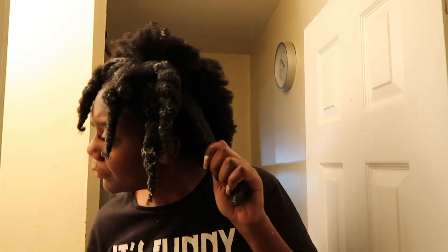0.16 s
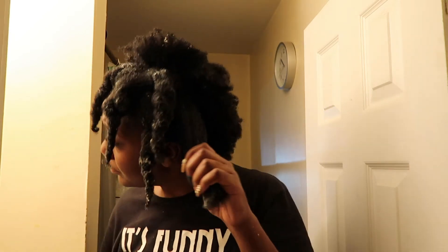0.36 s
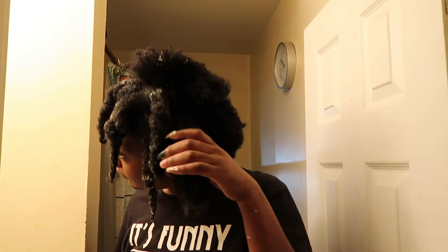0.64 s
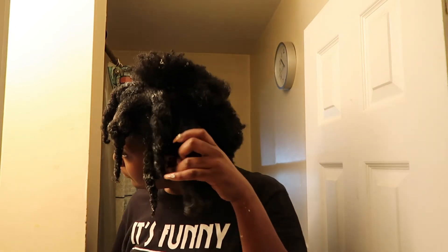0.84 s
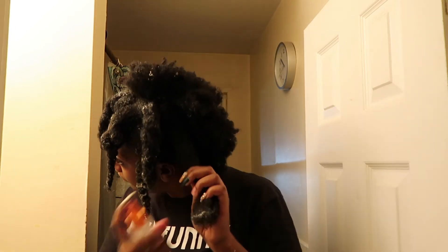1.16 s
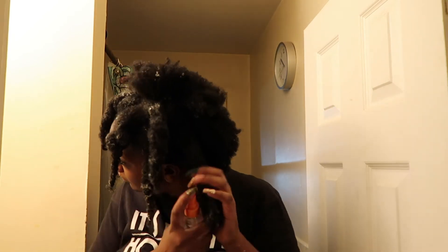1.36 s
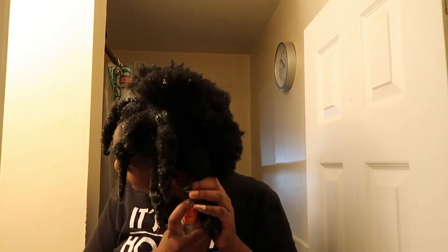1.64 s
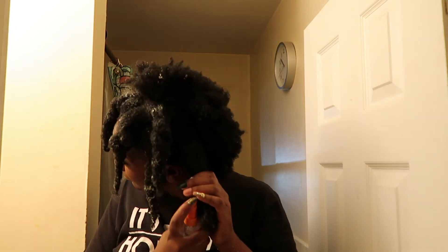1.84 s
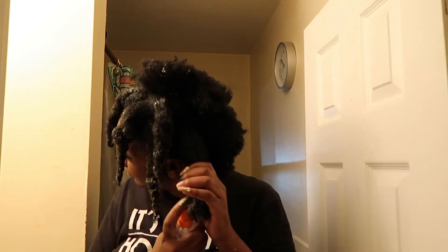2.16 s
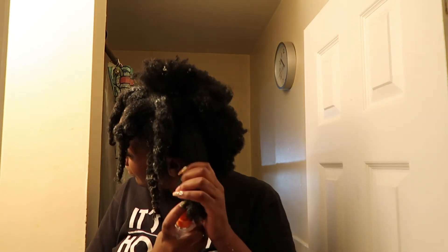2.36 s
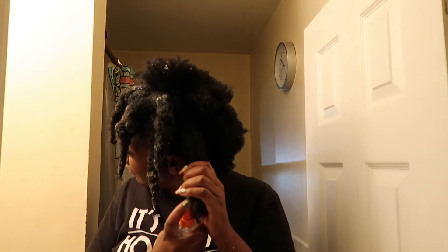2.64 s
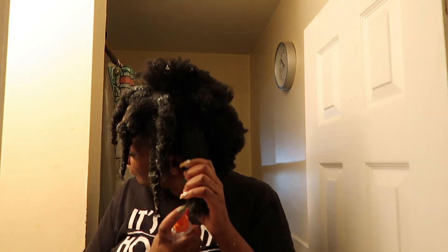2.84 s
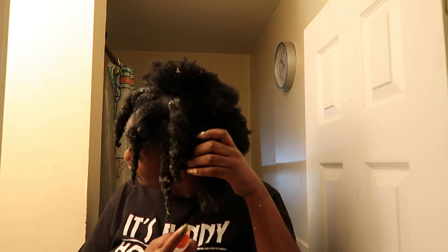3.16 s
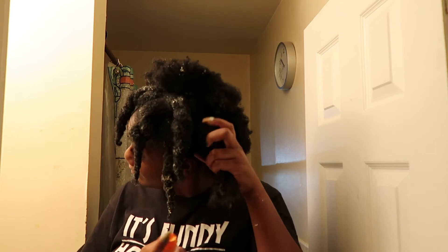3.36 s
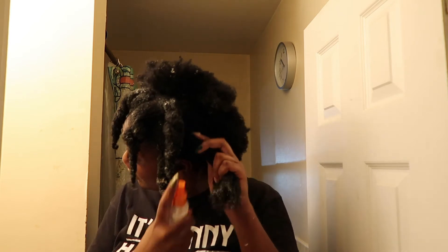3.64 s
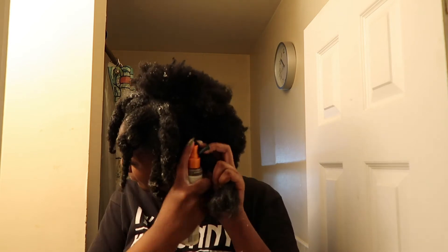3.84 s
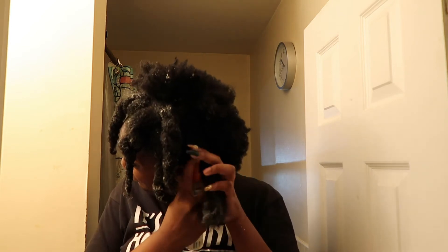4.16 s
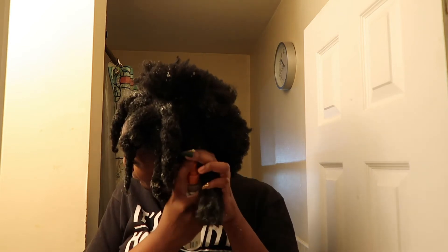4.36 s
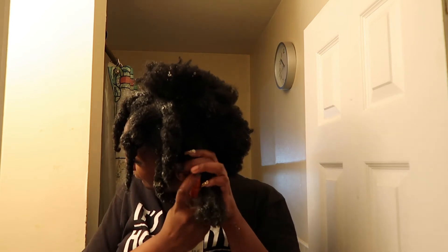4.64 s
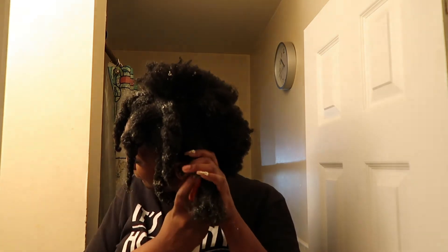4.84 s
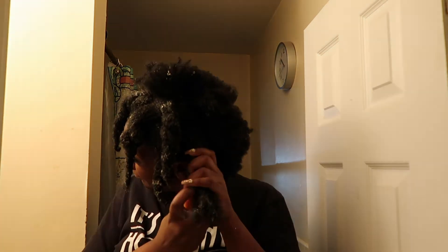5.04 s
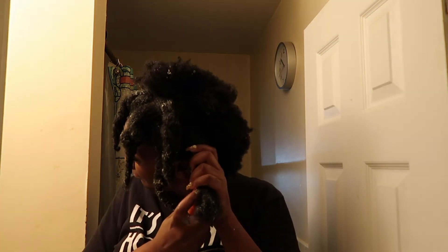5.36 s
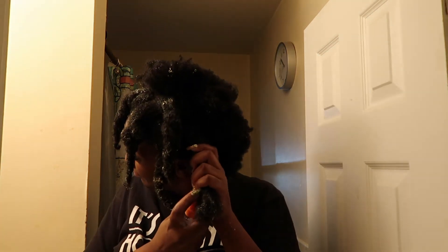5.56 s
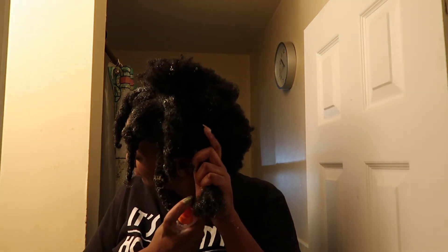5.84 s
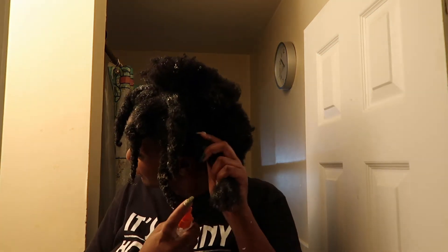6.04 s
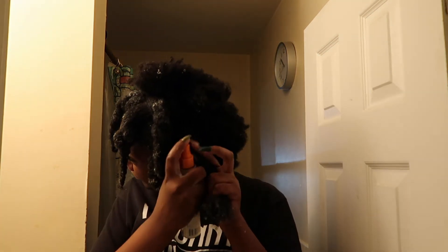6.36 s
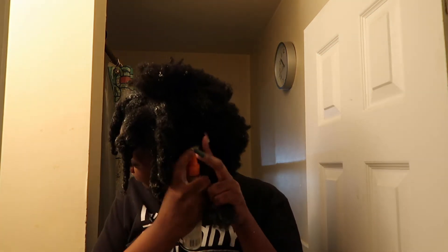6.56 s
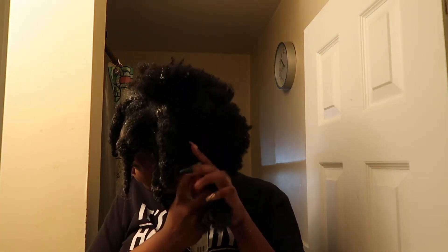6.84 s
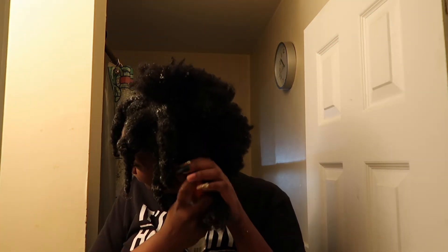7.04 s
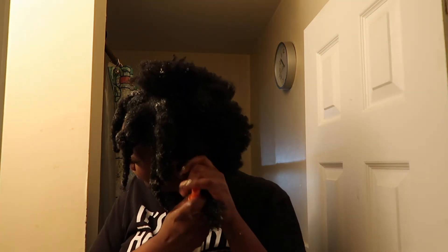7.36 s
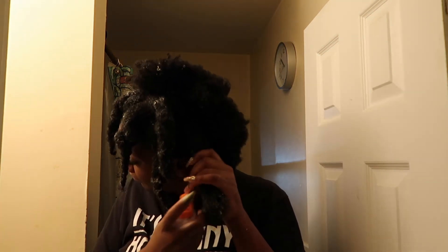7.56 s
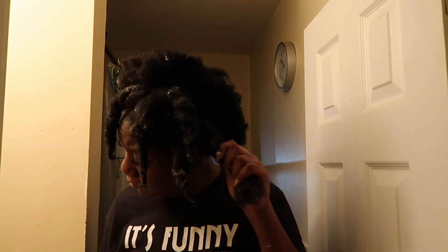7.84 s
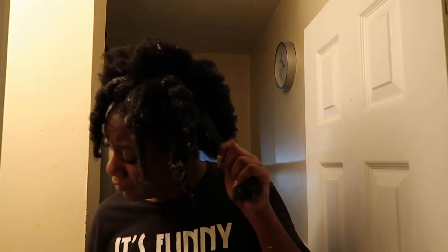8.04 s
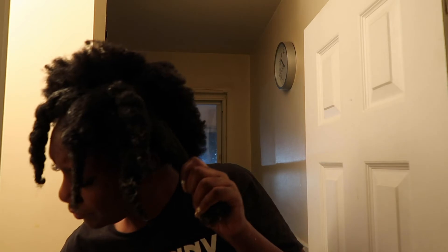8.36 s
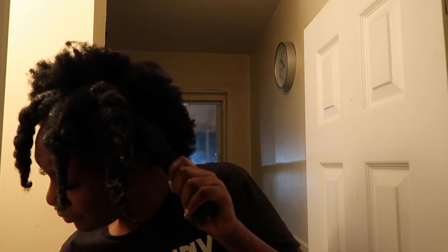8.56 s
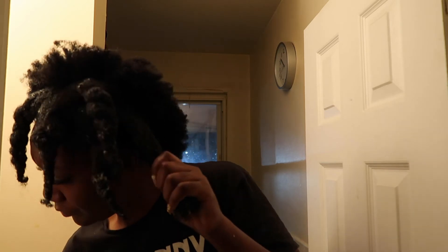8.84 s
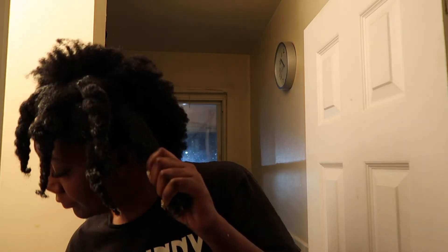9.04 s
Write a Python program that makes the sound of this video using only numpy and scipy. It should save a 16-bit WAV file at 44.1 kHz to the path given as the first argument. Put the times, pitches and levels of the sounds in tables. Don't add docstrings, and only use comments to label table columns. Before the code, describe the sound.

In a small hard room, a plastic spray bottle clicks and mists hair in short hissing bursts, then is set down with a thump.

```python
import sys
import numpy as np
from scipy import signal
from scipy.fft import rfft, irfft, next_fast_len
from scipy.io import wavfile
from scipy.ndimage import uniform_filter1d, map_coordinates

SR = 44100
rng = np.random.default_rng(int(sys.argv[2]) if len(sys.argv) > 2 else 0)


def decibels_to_gain(level_db):
    exponent = np.asarray(level_db, float) / 20
    return 10 ** exponent


def dump(signal):
    limited = np.clip(np.atleast_2d(signal).T, -1, 1)
    pcm = np.round(limited * 32767).astype(np.int16)
    wavfile.write(sys.argv[1], SR, pcm)


N = 405279
TIME = np.arange(N) / SR

# time [s], strength [dB].
VENTILATION = [(0.0, -49), (0.25, -54), (0.71, -49.5), (1.12, -55.5), (1.56, -54.5), (1.74, -54.5),
               (2.1, -53), (2.28, -53), (6.17, -54), (6.4, -51), (7.78, -53.5), (8.34, -53), (9.19, -51.5)]
# frequency [Hz], level [dB per Hz].
RUMBLE = [(12, -41), (20, -17), (32, 4.5), (80, 2), (118, 1.5), (133, -4.5), (151, -17), (160, -21),
          (210, -55), (350, -120)]
# frequency [Hz], level [dB per Hz].
DRONE = [(65, -59), (110, -5.5), (151, -10.5), (182, -7), (263, -9.5), (327, -8.5), (367, -15), (404, -12),
         (570, -23.5), (900, -30), (1170, -35), (1980, -120)]
# frequency [Hz], level [dB per Hz].
HISS = [(290, -31), (500, -5), (529, -2.5), (576, -5), (1660, -8.5), (3120, -11.5), (3700, -12.5),
        (4080, -14.5), (5260, -15.5), (12800, -27.5), (14500, -28)]
# time [s], rustle [dB].
RUSTLE = [(0.0, -64), (0.82, -65), (1.92, -62.5), (2.79, -65), (2.92, -62), (3.66, -65), (4.66, -65),
          (4.76, -63.5), (6.68, -65), (7.09, -63), (7.73, -64.5), (9.19, -65)]
# frequency [Hz], side minus mid [dB].
PORTS_NEAR = [(60, -23), (110, -50), (200, -47), (380, -17), (700, -28), (1290, -23), (2380, -15.5),
              (4400, -7.5), (8120, 1.5), (15000, 6)]
# frequency [Hz], side minus mid [dB].
PORTS_FAR = [(60, -42), (110, -13.5), (200, -5), (380, -1), (700, 0.5), (1290, 0), (2380, -1.5), (4400, -2),
             (8120, -1), (15000, 1)]
# frequency [Hz], t60 [s].
ROOM = [(100, 0.22), (500, 0.15), (2500, 0.47), (6000, 0.44), (12000, 0.091)]
# start [s], boom [dB],
# knock minus boom [dB], clack minus boom [dB], boom pitch ratio.
THUMPS = [
    (-0.085, -30, -2, -15, 0.685),
    (8.599, -30.5, 1, -13.5, 1.03),
]
# frequency [Hz], level [dB], t60 [s].
COUNTER = [(100, 8, 0.47), (163, 10.5, 0.53), (227, 9.5, 0.69)]
# frequency [Hz], level [dB per Hz].
WOOD = [(120, -35), (200, -7.5), (328, 0.5), (364, -8.5), (503, -3), (699, -14.5), (748, -12), (795, -26),
        (863, -14.5), (1200, -36.5), (1560, -59), (2640, -120)]
# frequency [Hz], level [dB per Hz].
BASE = [(590, -35), (1000, -17), (1270, -9), (1410, 7), (1740, -10), (2240, 2), (2590, -12), (2840, 2.5),
        (3560, -11), (4370, -9), (5480, -19.5), (7000, -30), (9100, -28), (15400, -120)]
# start [s], peak [dB], ring [Hz], low knock minus peak [dB].
TICKS = [(0.4653, -47, 2560, -8), (1.15, -50, 5500, -22), (1.2632, -31, 2790, -11),
         (2.7535, -32, 2760, -16), (3.951, -49, 2990, -16), (4.0372, -27.5, 2800, -13.5),
         (4.573, -31.5, 2800, -17), (4.9636, -30.5, 2680, -14), (5.3722, -33, 2790, -19.5),
         (6.6498, -32, 2780, -11), (7.274, -36, 2800, -15), (8.6006, -25.5, 2830, -10),
         (8.7894, -49, 1640, 12), (9.1526, -52, 3630, -20)]
# start [s], peak [dB], ring [Hz], low knock minus peak [dB].
SCUFFS = [(1.925, -38, 2720, -14), (2.1974, -49, 1830, -24), (2.359, -40, 2840, -13),
          (4.4373, -53, 1870, -11), (5.2145, -44, 1800, -12), (5.692, -44, 1450, -1), (7.128, -43, 2270, 1),
          (7.3552, -42, 2700, -4), (7.386, -44, 1790, 3), (7.6887, -47, 1640, 10)]
# start [s], length [s], mist [dB], ring centre [Hz], air in the jet [dB].
SQUEEZES = [(1.598, 0.11, -46, 2700, 0), (1.989, .12, -46, 2800, 2.5), (2.433, 0.099, -47, 2480, 3),
            (2.778, .11, -43.5, 2820, 0), (4.239, 0.092, -52, 2230, 0.5), (4.624, 0.12, -45, 2780, -2),
            (5.0, .13, -45, 2900, -4.5), (5.434, 0.12, -47.5, 2550, -6.5),
            (5.796, 0.079, -47.5, 2700, -0.5), (6.95, .11, -41, 2840, -1)]
# low rasp minus mist [dB], nozzle cup minus mist [dB].
GRIPS = [(0.5, -6), (-3, -7), (-7, -9.5), (-8, -28), (-5, -14), (-2.5, -3), (-16, -15), (-27, -4),
         (-2, -10), (-5.5, -7)]
# frequency [Hz], level [dB per Hz].
MIST = [(1940, -12), (3300, -9), (3760, -5.5), (4750, -7.5), (5070, -6), (6960, -5.5), (8300, -11.5),
        (12500, -11), (14400, -16), (15300, -1), (15600, -45)]
# resonance [Hz], width [Hz], level [dB].
BOTTLE = [(1980, 540, 0), (2400, 240, 0), (2800, 280, 2.5), (3280, 170, 0)]
# resonance [Hz], width [Hz], level [dB].
NECK = [(1238, 320, 3.5), (1620, 3300, -2)]
# resonance [Hz], width [Hz], level [dB].
NOZZLE = [(4340, 740, 0)]

RUMBLE_DB, DRONE_DB, DRONE_FOLLOWS = -50.5, -53.5, 0.05
RUSTLE_DB, LOW_RUSTLE_DB, LOW_FOLLOWS = -64.5, -60.5, 0.89
WHINE_HZ, WHINE_RATE = 13011, 25.0029
CREAK_S, CREAK_LENGTH_S, CREAK_HZ, CREAK_DB, CREAK_SAG_HZ = 8.94, 0.2, 256, -56.5, 22.3
LAND_S, HOLD_S = 0.037, 0.17
BOOM_DB_PER_S, DAMPED_DB_PER_S, KNOCK_DB_PER_S, CLACK_DB_PER_S = 83, 159, 161, 230
OPEN_S, CRACK_DB, SWELL_DB, CREST, SAG_DB, SHUT_DB_PER_S = 0.012, -1.5, 4.5, 0.34, 0.5, 420
RING_DB, RING_HZ_PER_DB, SPUTTER_DB = 3.5, 60, -1.5


def unit(x):
    return x / np.sqrt(np.mean(x ** 2) + 1e-20)


def along(points, hz):
    f, v = np.transpose(points)
    return np.interp(np.log(hz + 1), np.log(f + 1), v)


def swing(rows):
    db = np.interp(TIME, *np.transpose(rows))
    return db - db.mean()


def wobble(rate):
    knots = rng.standard_normal(int(N * rate / SR) + 4)
    return map_coordinates(knots, [TIME * rate])


def filtered(x, response):
    m = next_fast_len(N + SR // 2)
    return irfft(rfft(x, m) * response(np.fft.rfftfreq(m, 1 / SR)), m)[..., :N]


def coloured(spectrum):
    return lambda hz: decibels_to_gain(along(spectrum, hz))


def resonant(peaks):
    def response(f):
        total = 0
        for k, (centre, width, db) in enumerate(peaks):
            damping = 1j * f * width
            total = total + (-1) ** k * decibels_to_gain(db) * damping / (centre * centre - f * f + damping)
        return total
    return response


def noise(response, patchy_db, spiky_db=0):
    grains = rng.standard_normal((2, N)) * decibels_to_gain(spiky_db * rng.exponential(size=N))
    z = signal.stft(grains, nperseg=256)[2]
    field = uniform_filter1d(rng.standard_normal(z.shape[1:]), size=4, axis=0)
    field = uniform_filter1d(field, size=10, axis=1)
    patchy = signal.istft(z * decibels_to_gain(patchy_db * unit(field)), nperseg=256)[1][:, :N]
    return unit(filtered(patchy, response))


def ports(pair, wide):
    return np.array([pair[0], filtered(pair[1], coloured(wide))])


def room(pair, early_db):
    hz, t, z = signal.stft(rng.standard_normal((2, SR // 2)), SR, nperseg=128)
    late = decibels_to_gain(-60 * t / along(ROOM, hz)[:, None])
    early = decibels_to_gain(early_db - 60 * t / 0.05)
    tail = signal.istft(z * (late + early), SR, nperseg=128)[1]
    delayed = np.pad(pair, ((0, 0), (180, 0)))
    return signal.fftconvolve(delayed, tail / np.linalg.norm(tail[0]), axes=1)[:, :N]


def whine():
    turn = TIME * WHINE_RATE % 1
    gate = uniform_filter1d(1.0 * (turn > 0.33) * (turn < 0.9), size=90)
    phase = np.array([[1.05], [-1.05]])
    return decibels_to_gain(-68.5) * gate * np.sin(2 * np.pi * WHINE_HZ * turn / WHINE_RATE + phase)


def background():
    gust_db, hands_db = swing(VENTILATION), swing(RUSTLE)
    rumble = decibels_to_gain(RUMBLE_DB + gust_db) * noise(coloured(RUMBLE), patchy_db=1.4)
    drone = decibels_to_gain(DRONE_DB + DRONE_FOLLOWS * gust_db) * noise(coloured(DRONE), patchy_db=1.05)
    high = noise(lambda f: coloured(HISS)(f) / np.sqrt(1 + (2700 / (f + 1)) ** 4), patchy_db=1.9, spiky_db=1.5)
    low = noise(lambda f: coloured(HISS)(f) / np.sqrt(1 + (f / 2700) ** 4), patchy_db=0.3)
    high = decibels_to_gain(RUSTLE_DB + hands_db) * high
    low = decibels_to_gain(LOW_RUSTLE_DB + LOW_FOLLOWS * hands_db) * low
    mid, side = ports(rumble + drone + high + low, PORTS_FAR)
    return np.array([filtered(mid, lambda f: 1 / (1 + (f / 13400) ** 16)), side])


def creak():
    u = np.clip((TIME - CREAK_S) / CREAK_LENGTH_S, 0, 1)
    turn = 2 * np.pi * np.cumsum(CREAK_HZ - CREAK_SAG_HZ * u + 6 * wobble(60)) / SR
    shape = np.sqrt(u) * (1 - u) ** 0.96 * decibels_to_gain(CREAK_DB + 15.5 + 1.4 * wobble(40))
    groan = np.sin(turn) + decibels_to_gain(-12.5) * np.sin(2 * turn) + decibels_to_gain(-14) * np.sin(3 * turn)
    return shape * groan * [[1], [0.15]]


def thumps():
    start, boom_db, knock_db, clack_db, ratio = np.transpose(THUMPS)[..., None]
    t = TIME - start
    land_db = boom_db + np.where(t > 0, 0, -200)

    def fade(db, db_per_s):
        level = decibels_to_gain(land_db + db - db_per_s * np.maximum(t - LAND_S, 0))
        return uniform_filter1d(level, size=260)

    def boom_noise(r):
        modes = [(hz * r, np.clip(8 / t60, 20, 50), db) for hz, db, t60 in COUNTER]
        return noise(lambda f: resonant(modes)(f) / (1 + (f / 260) ** 6), patchy_db=2.0)

    damped_db = -DAMPED_DB_PER_S * np.maximum(t - HOLD_S, 0)
    booms = np.array([boom_noise(r) for r in ratio[:, 0]])
    boom = (fade(damped_db, BOOM_DB_PER_S)[:, None] * booms).sum(axis=0)
    knock = fade(knock_db, KNOCK_DB_PER_S).sum(axis=0) * noise(coloured(WOOD), patchy_db=3.0)
    clack = fade(clack_db, CLACK_DB_PER_S).sum(axis=0) * noise(coloured(BASE), patchy_db=2.5)
    return ports((boom + knock + clack) * decibels_to_gain([[0], [-1.5]]), PORTS_NEAR)


def contacts(events, attack, length, lift_db, snap):
    out, t = np.zeros((2, N + SR)), np.arange(SR // 10) / SR
    f = np.fft.rfftfreq(len(t), 1 / SR)
    for s, db, ring_hz, knock_db in events:
        slips = rng.standard_normal((2, len(t)))
        burst = slips * decibels_to_gain(-60 * t / length) * (1 - np.exp(-t / attack))
        burst = burst + snap * (t == 0) * [[1], [0.7]]
        cap = resonant([(ring_hz, 150, 0), (ring_hz * 1.19, 250, -11), (ring_hz * 1.65, 600, -20)])
        chamber = resonant([(900, 450, knock_db - 5), (1800, 450, knock_db - 3)])
        softness = (1 + 1j * f / 4500) ** 4
        hit = irfft(rfft(burst) * (cap(f) + chamber(f)) / softness, len(t))
        first = round(s * SR)
        out[:, first:first + len(t)] += decibels_to_gain(db + lift_db) * hit / np.abs(hit[0]).max()
    return out[:, :N]


def ticks():
    snaps = contacts(TICKS, attack=0.0002, length=0.004, lift_db=1.5, snap=12)
    scuffs = contacts(SCUFFS, attack=0.003, length=0.055, lift_db=0.0, snap=0)
    return snaps + scuffs


def pump():
    rows = np.hstack([SQUEEZES, GRIPS]).T
    under_way = np.maximum(np.searchsorted(rows[0], TIME) - 1, 0)
    start, length, db, hz, *shares_db = rows[:, under_way]
    t = TIME - start
    swell_db = np.interp(t / length, [0, CREST, 1], [-SWELL_DB, 0, -SAG_DB])
    crack_db = CRACK_DB * np.clip(1 - t / OPEN_S, 0, 1)
    shut_db = -SHUT_DB_PER_S * np.maximum(t - length * 0.87, 0)
    mist_db = np.where(t > 0, db + swell_db + crack_db + shut_db, -200)
    return mist_db, hz + RING_HZ_PER_DB * (swell_db + 2), *shares_db


def bottle_ring(centre_hz):
    centre_hz = np.clip(centre_hz, 1900, 3300)
    shares = np.array([np.exp(-((centre_hz - hz) / 750) ** 2) for hz, _, _ in BOTTLE])
    shares /= np.linalg.norm(shares, axis=0)
    ring = 0
    for share, mode in zip(shares, BOTTLE):
        body = lambda f: resonant([mode])(f) / (1 + (1300 / (f + 1)) ** 4)
        ring = ring + share * noise(body, patchy_db=1.2, spiky_db=1.5)
    return ring


def spray():
    mist_db, centre_hz, air_db, rasp_db, cup_db = pump()

    def push(db):
        return uniform_filter1d(decibels_to_gain(db), size=180)

    def sputter():
        return SPUTTER_DB * wobble(30)

    mist = push(mist_db + 0.5) * noise(coloured(MIST), patchy_db=1.0, spiky_db=1.63)
    ring = push(mist_db + RING_DB + air_db + 0.2 * sputter()) * bottle_ring(centre_hz)
    rasp = noise(lambda f: resonant(NECK)(f) ** 2, patchy_db=2.2, spiky_db=1)
    rasp = push(mist_db + rasp_db + sputter()) * rasp
    cup = noise(lambda f: resonant(NOZZLE)(f) ** 2, patchy_db=3.5)
    cup = push(mist_db + cup_db + sputter()) * cup
    return mist + ring + rasp + cup


def scene():
    jet, cap = spray(), ticks()
    wet_jet = jet + decibels_to_gain(-8.5) * room(jet, early_db=3.0)
    wet_cap = cap + decibels_to_gain(-1.0) * room(cap, early_db=10)
    bottle = ports(wet_jet + wet_cap, PORTS_NEAR)
    mid, side = background() + creak() + thumps() + bottle
    return np.array([mid + side, mid - side]) + whine()


def band_limit(x):
    return signal.sosfilt(signal.butter(12, 15730, fs=SR, output="sos"), x)


def record(dry):
    limited = filtered(dry, lambda hz: hz < 15730)
    return band_limit(limited + 0.00022)


dry = scene()
out = record(dry)
dump(out)
```